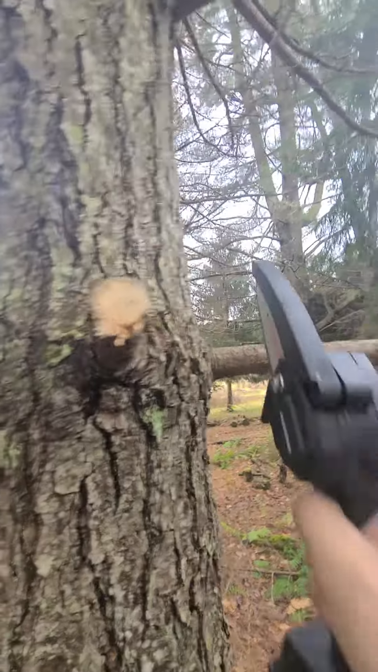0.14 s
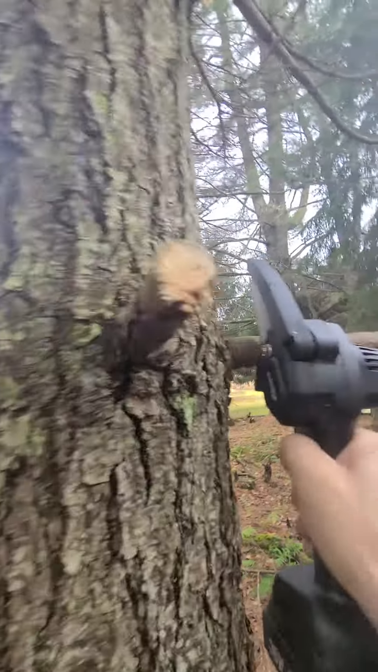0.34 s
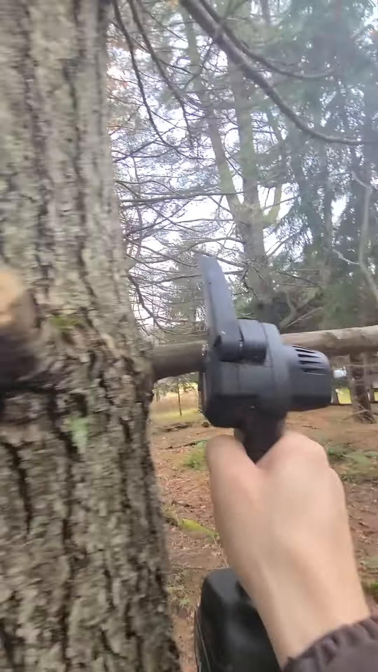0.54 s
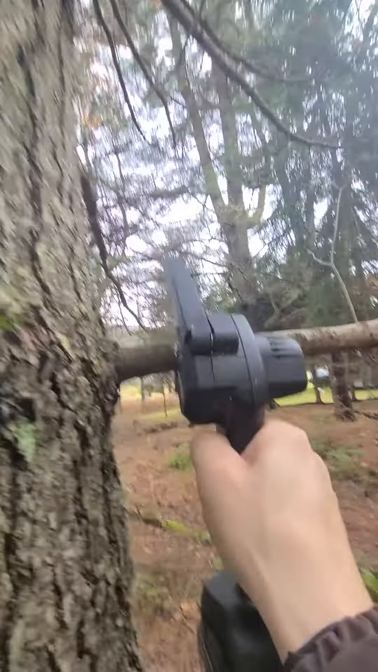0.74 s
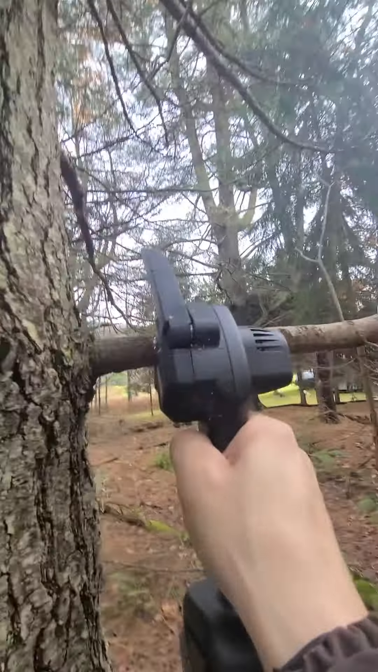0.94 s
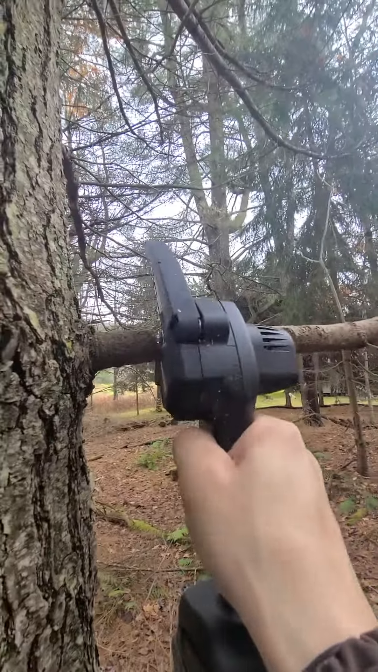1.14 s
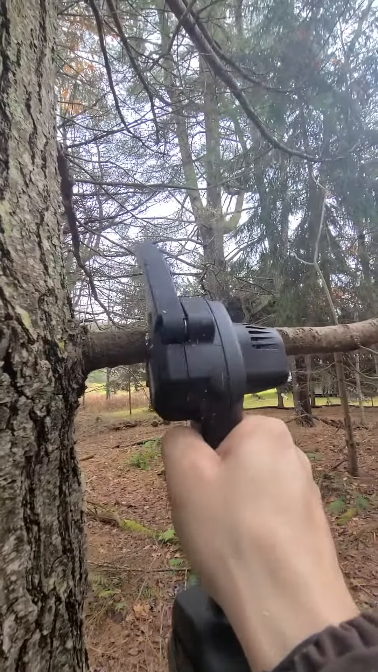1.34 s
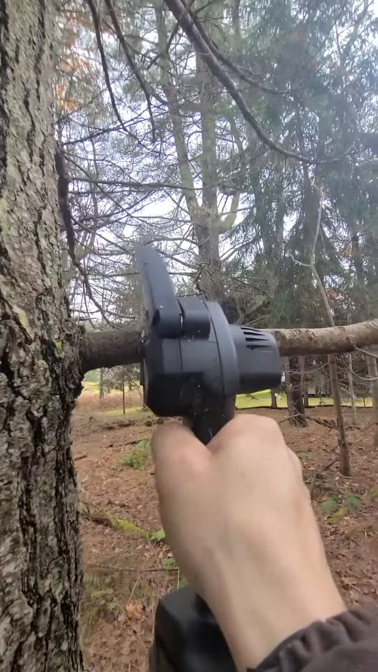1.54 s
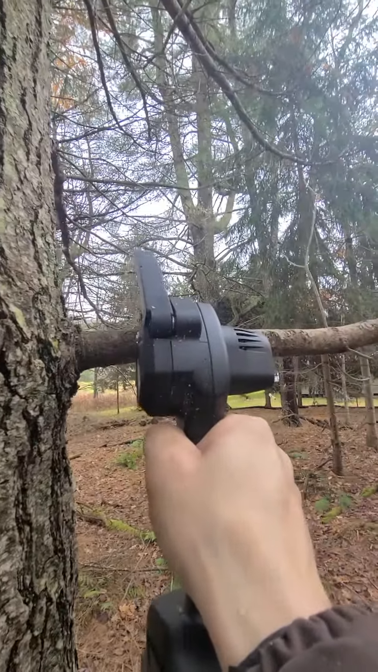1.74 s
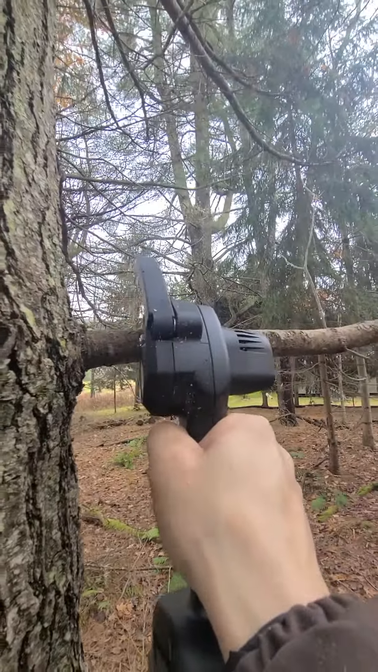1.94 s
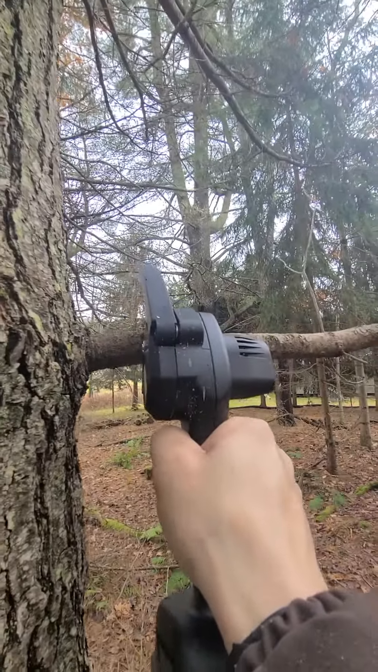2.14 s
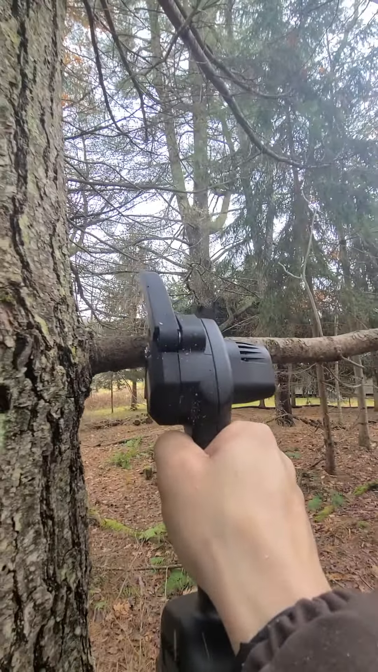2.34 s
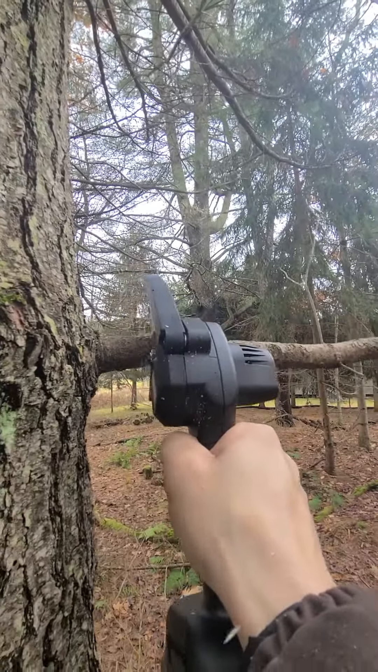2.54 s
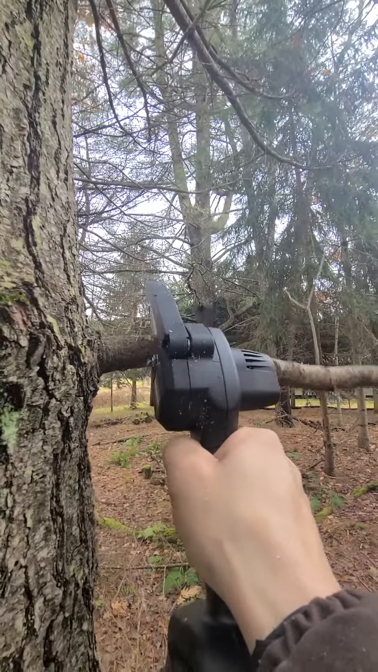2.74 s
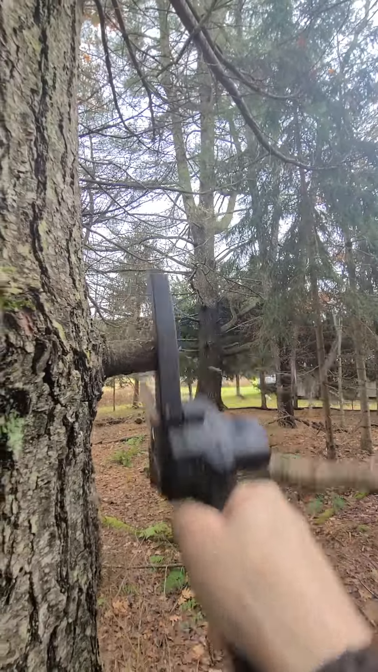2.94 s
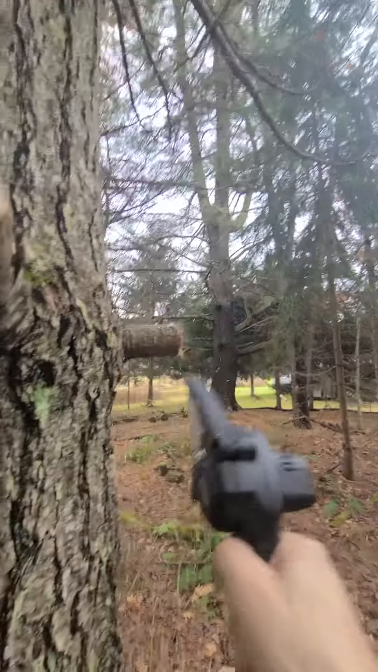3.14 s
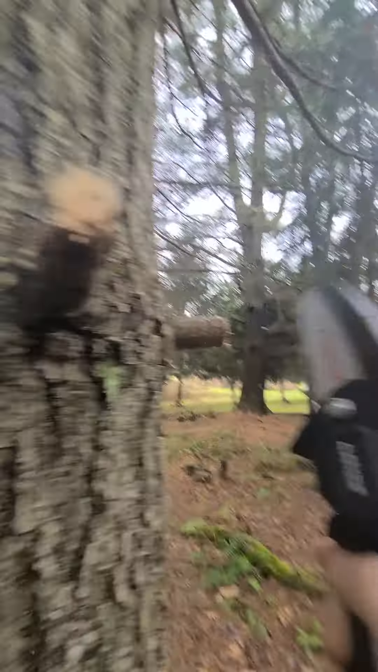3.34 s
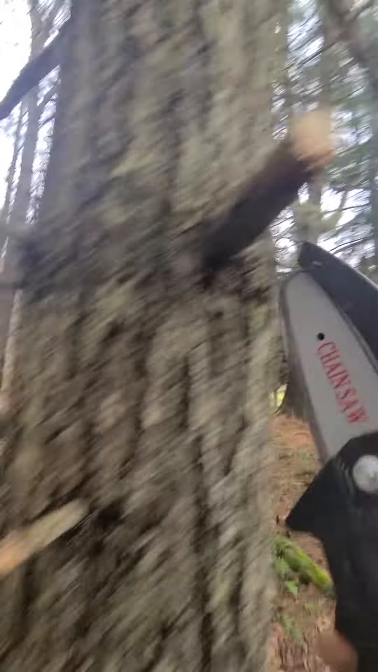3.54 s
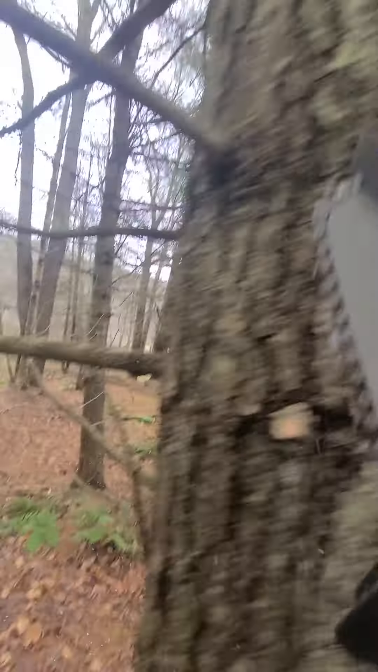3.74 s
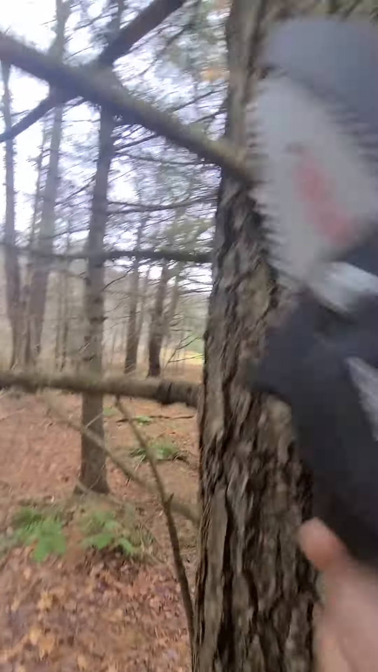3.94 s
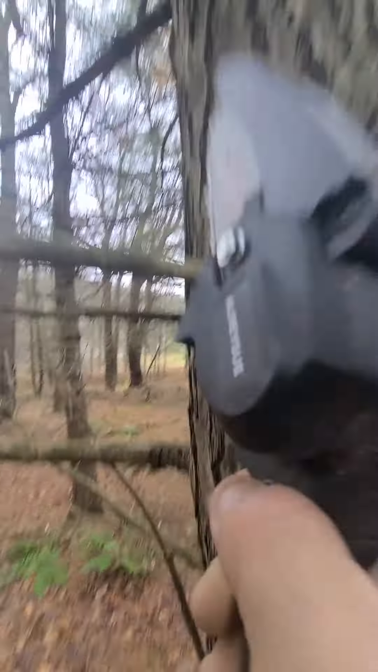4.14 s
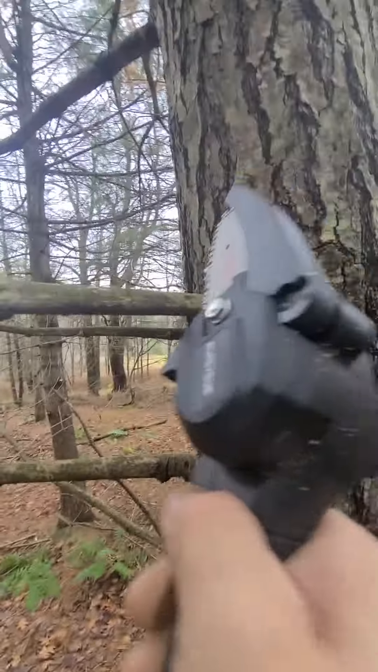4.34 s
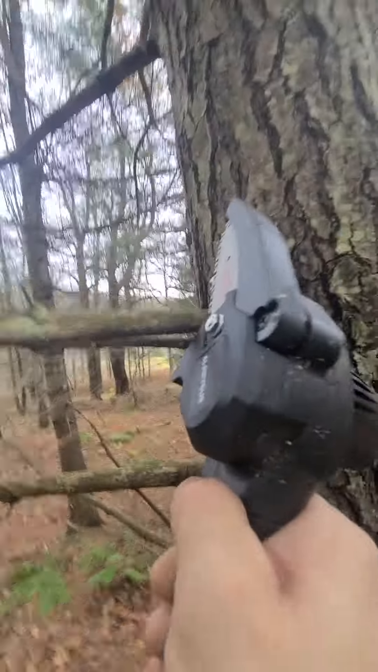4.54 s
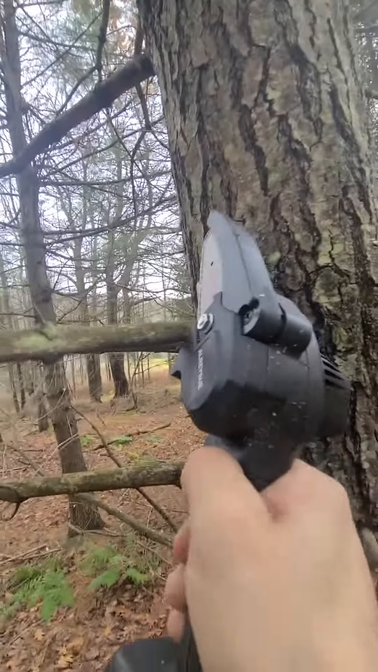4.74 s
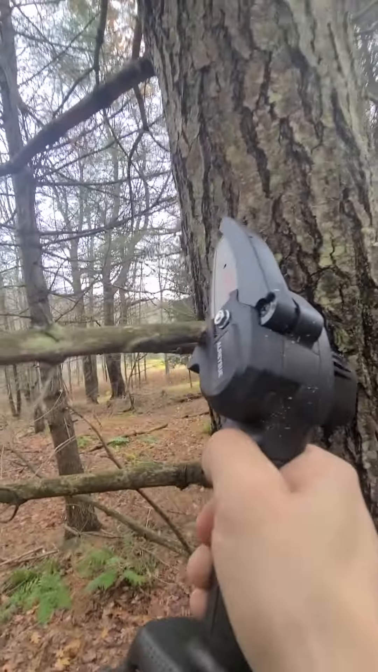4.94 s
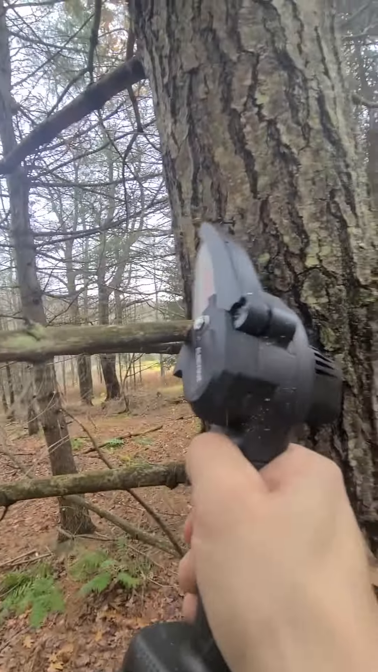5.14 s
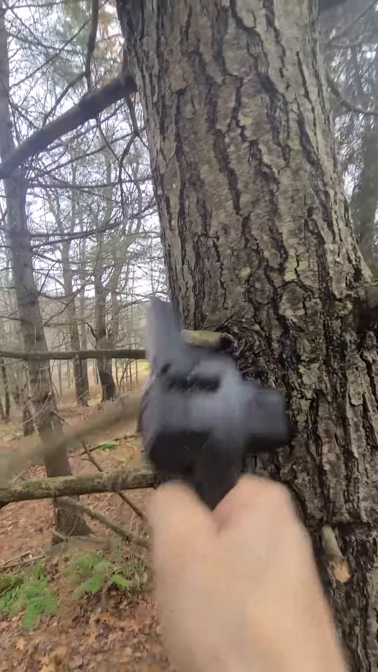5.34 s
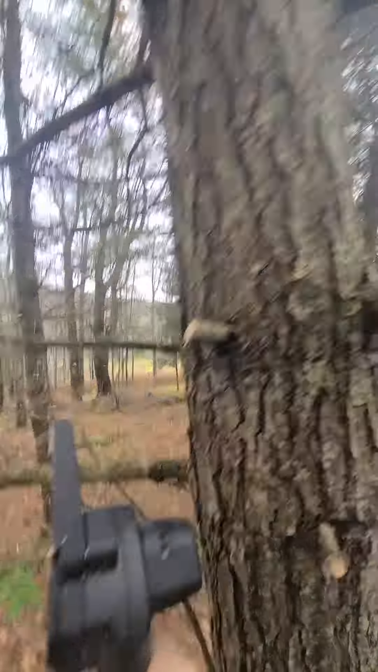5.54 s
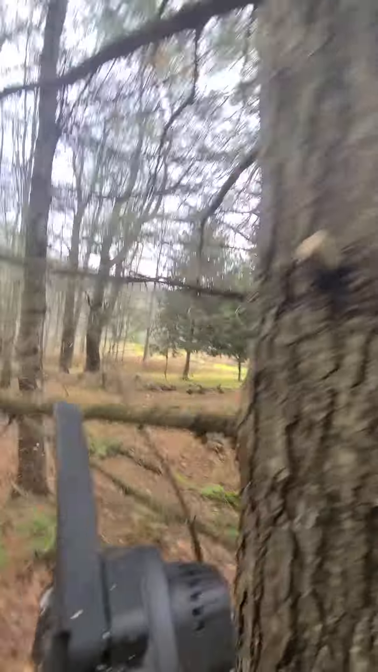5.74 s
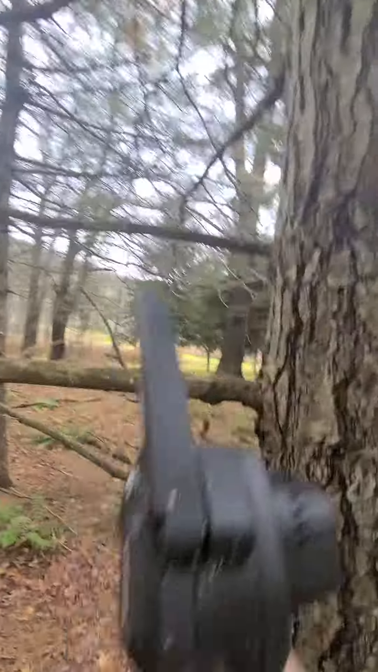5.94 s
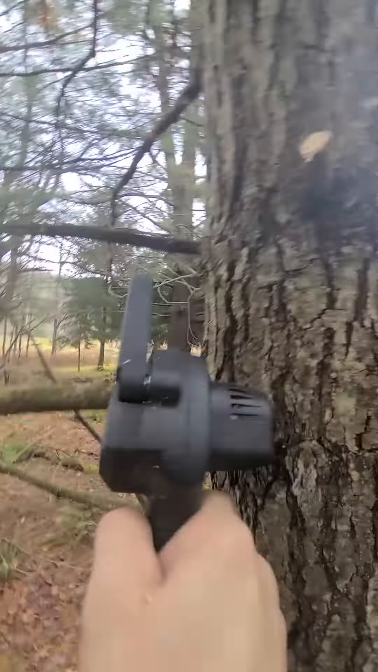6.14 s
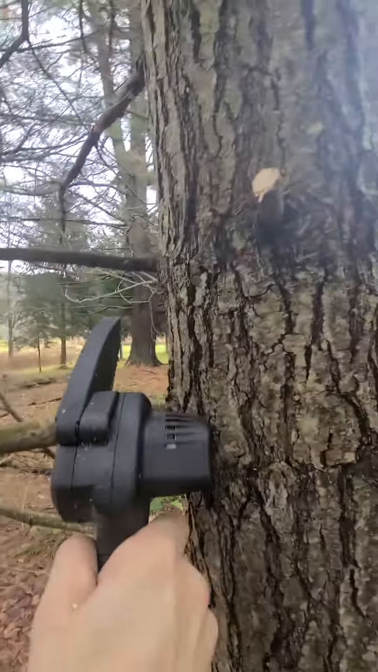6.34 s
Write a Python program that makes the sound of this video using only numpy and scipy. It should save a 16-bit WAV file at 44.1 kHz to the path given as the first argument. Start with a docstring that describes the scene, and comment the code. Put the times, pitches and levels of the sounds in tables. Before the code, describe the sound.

Very close to the microphone, a handheld electric chainsaw makes three cuts outdoors. Small clicks precede a harsh buzzing cut of almost two seconds; the branch gives way, the chain races and winds down with loose metallic slaps, and a soft thud follows. Trigger clicks and rustles lead to a brief second cut and another rattling coast. Light crackles and footfalls come before a third cut, broken off abruptly. The trees are faintly hushed.

```python
"""First a plastic click with a low knock in quiet woodland, then a small battery chainsaw starts up close by.
It lops two dry branches and starts on a third: its teeth chop and snag, and branch and saw ring with them.
Once through the first two, the chain races, whines and coasts to a rattling stop.
Clicks, soft thuds, crackles underfoot and soft swishes lie between the cuts. Short bursts of shaped noise make
the contacts; fading sine waves make the knocks, and wavering tones tied to the chain speed make the whine.
"""
import sys
import numpy as np
from scipy import signal
from scipy.fft import rfft, irfft, next_fast_len
from scipy.io import wavfile
from scipy.ndimage import uniform_filter1d, map_coordinates

SR = 44100
rng = np.random.default_rng(int(sys.argv[2]) if len(sys.argv) > 2 else 0)


def waveform_to_disk(signal):
    """Save audio, clipped to [-1, 1], as 16-bit WAV at the path in sys.argv[1]."""
    frames = np.transpose(np.atleast_2d(signal))
    scaled = np.clip(frames, -1, 1) * 32767
    samples = np.round(scaled).astype(np.int16)
    wavfile.write(sys.argv[1], SR, samples)


N = 286650
SECONDS = np.arange(N) / SR

# All levels in the tables are settings before the final mix.
# Soft swishes of cloth and leaves, and the woodland's echo as the saw stops:
# [loudest at t/s, level/dB, rise t/s, fall t/s]
SWISHES = [(3.58, -41.5, 0.065, 0.23), (3.725, -46.5, .03, 0.014), (3.866, -31, 0.0053, 0.0066),
           (4.295, -38, 0.056, 0.041), (6.16, -50, 0.023, 0.021), (6.25, -41.5, 0.13, 0.15)]
# Tone of the swishes, and of the hush of the trees: [f/Hz, relative level/dB]
CLOTH = [(59, -55), (100, 0), (471, -13), (535, -10), (676, -12), (1010, -20), (2130, -12), (6700, -17.5),
         (8280, -26.5), (16000, -19)]
WOODS = [(12, -61.5), (20, -32), (70, 1), (134, -14.5), (293, -8.5), (527, -11.5), (897, -14),
         (1190, -14.5), (3440, -25.5), (5380, -35), (6540, -31.5), (8180, -49.5), (12400, -39.5),
         (16000, -51.5)]
# Soft thuds of the falling branch and of feet, and a low knock with the first click: [t/s, level/dB, f/Hz]
THUDS = [(0.242, -34, 166), (0.461, -47.5, 110), (3.277, -26, 103), (3.299, -32, 62.1), (3.881, -37, 45.45),
         (4.29, -34.5, 134.2), (4.327, -34, 96), (4.361, -33.5, 104), (6.038, -34, 87), (6.159, -37, 95.3),
         (6.199, -38, 79)]
# Tone of the dull puff in a thud: [f/Hz, relative level/dB]
THUD_PUFF = [(20, -29), (85, 0), (160, -4), (300, -5), (1000, -7.5), (4000, -43)]
# Clicks of trigger, guard and slack chain, and small crackles underfoot:
# [t/s, snap level/dB, hollow knock level/dB, bright edge level/dB]
CLICKS = [(0.239, -16.5, -25.5, -34), (0.264, -37, -32, -50), (0.3033, -37, -47, -44.5),
          (0.4587, -35, -39, -40), (0.514, -41, -41, -51), (0.615, -42, -38, -51),
          (1.0407, -35.5, -14, -65), (3.538, -16.5, -12.5, -44), (3.5581, -22.5, -24, -40),
          (3.6237, -35, -44, -43), (3.8687, -16, -24.5, -40), (4.293, -33, -31, -31.5),
          (4.365, -42, -45, -64), (4.5531, -31, -24, -66), (6.015, -34, -25, -36),
          (6.0384, -22.5, -20.5, -25.5), (6.0758, -28.5, -30, -32), (6.1582, -21.5, -27, -25.5),
          (6.199, -32, -27, -33.5), (6.2917, -55, -31, -54), (6.324, -13.5, -22, -17)]
# Tone of a click: [f/Hz, relative level/dB]
CLICK_TONE = [(200, -17), (1100, 1), (1700, 10), (2500, 2.5), (3400, 3.5), (4500, -8.5), (7000, -17),
              (16000, -50)]
# Hollow notes of the plastic housing: [f/Hz, level/dB, time to fade by 60 dB t/s]
HOUSING = [(396, -14, 0.13), (440, -0.5, 0.047), (564, 1, 0.038), (630.5, 0.5, 0.042), (715, -8.5, 0.057)]

# Pulls of the trigger: [pressed t/s, released t/s, chain stops t/s, rattle level/dB, sizzle level/dB,
#  sizzle left over right level/dB, chain speed at which the rattle is halved (links/s), the same for the
#  sizzle (links/s), housing drone level/dB, lift of the top fizz when not cutting level/dB]
PULLS = [(1.073, 2.905, 3.555, -27.5, -25, 0, 225, 296, -2, 4.5),
         (4.634, 5.315, 6.09, -27, -21.5, -0.5, 330, 345, -9.5, 0.5),
         (6.324, 6.6, 6.7, -26.5, -23.5, 2.5, 460, 230, -4.5, 5)]
# How strongly the drive sings, one value for each pull: [level/dB]
WHINE_DB = [-3, -2.5, -4]
# Rough tones of the drive: [multiple of the link rate, level/dB, width f/Hz]
DRIVE_TONES = [(.4, -39, 30), (.5, -35, 28), (.8, -39, 50), (1, -29.5, 28), (1.22, -40, 60), (1.5, -40, 70),
               (2, -36.5, 55), (2.3, -32.5, 110), (2.75, -36.5, 90), (3.5, -39, 150)]
# How well the housing gives out those tones: [f/Hz, level/dB]
HORN = [(120, -24), (200, -7), (260, -5), (330, -9), (450, 0), (580, 1.2), (700, 1), (800, -4), (930, -3),
        (1100, -6), (1400, -1), (2000, 1), (2600, 0)]
# Tone of the chain's rattle, and of its bright sizzle: [f/Hz, relative level/dB]
RATTLE = [(100, -17.5), (250, -13.5), (420, 1), (620, 1), (850, -1), (1050, 1), (1400, 5), (1900, 3.5),
          (2200, 3.5), (2500, 0), (3400, 4.5), (5000, -7), (9000, -18), (16000, -29.5)]
SIZZLE = [(2000, -26), (4000, -6.5), (5200, -4), (6400, 5.5), (7700, -5.5), (8900, -2), (9900, -2),
          (11000, -0.5), (13000, -2.5), (14500, 0.5), (15600, 5.5)]
# Ringing notes of the steel bar: [f/Hz, width f/Hz, level/dB]
BAR = [(1345, 52, -7.5), (1542, 72, -4), (1855, 140, -3), (2120, 310, -2), (2482, 180, -2), (2940, 110, -2),
       (3245, 77, -1.5)]
# Slaps of the slack chain on the bar as it runs free: [t/s, level/dB]
SLAPS = [(2.952, -14.5), (3.008, -13), (3.175, -14), (3.2131, -14.5), (3.294, -15.5), (3.3383, -16.5),
         (3.36, -16.5), (3.402, -17), (3.4474, -19.5), (3.472, -21), (3.521, -26), (5.2637, -15),
         (5.347, -14), (5.56, -14.5), (5.6553, -13.5), (5.7025, -13), (5.722, -16.5), (5.737, -18),
         (5.766, -19), (5.8, -15), (5.813, -18.5), (5.824, -21.5), (5.889, -21.5), (5.955, -31)]
# Resonances of the saw's shell and bar: [f/Hz, width f/Hz, lift level/dB]
SHELL = [(445, 64, 4.5), (590, 136, 3.5), (690, 32, 5), (1340, 180, 1.5), (1707, 44, 4.5), (1900, 66, 5.5),
         (2430, 120, 4.5), (6400, 460, -3), (8940, 760, 3), (15450, 500, -1.5)]
# The saw at the two microphone ports, three curves: [f/Hz, likeness from 0 to 1],
# [f/Hz, left over right level/dB] and [f/Hz, lead of the left port (radians)]
ALIKE = [(60, 0.21), (350, 0.78), (700, 0.98), (1400, 0.55), (2800, 0.6), (5000, 0.053), (15000, .25)]
TILT = [(60, -3.5), (380, -7), (700, -2.5), (1300, -8.5), (2400, -6.5), (4400, 8), (8000, 19.5),
        (15000, -35)]
LEAD = [(200, -0.21), (400, -0.77), (700, -1.64), (1030, 1.35), (1550, 1.51), (2800, 1.76), (5000, 1.7),
        (9000, 0.83)]

# Cuts: [teeth enter t/s, entering takes t/s, out of the wood t/s, leaving takes t/s, bite level/dB,
#  shudder against bite level/dB, tooth noise against bite level/dB, then changes while cutting:
#  rattle level/dB, sizzle level/dB, sizzle left over right level/dB]
CUTS = [(1.082, 0.02988, 2.829, .11, -20, -18, -7, -2, 3.26, 5.4),
        (4.655, .045, 5.16, .025, -23.5, -13.5, -3.5, 3, 0.62, 7.3),
        (6.345, 0.0305, 6.7, .05, -21.5, -21, -10, 1, 2.6, 3)]
# Hard snags of the teeth, and one knock of the coasting chain: [t/s, level/dB]
SNAGS = [(1.095, -10.5), (1.13, -5), (1.16, -8), (1.192, -9.5), (1.213, -9), (1.243, -9), (1.264, -17),
         (1.351, -18), (1.551, -8.5), (1.599, -20), (1.632, -11.5), (1.659, -11), (1.696, -10.5),
         (1.733, -12.5), (1.763, -10.5), (1.79, -11.5), (1.806, -11.5), (1.861, -6), (1.9925, -10.5),
         (2.1386, -14), (2.26, -8.5), (2.31, -12.5), (2.33, -14), (2.423, -9.5), (2.497, -14), (2.54, -13),
         (2.693, -8), (2.767, -14.5), (2.996, -12.5), (4.686, -8), (4.697, -9), (4.766, -14.5),
         (4.804, -11), (4.963, -13), (5.012, -16), (5.122, -13), (6.369, -10.5), (6.381, -12.5),
         (6.421, -11.5), (6.443, -10), (6.481, -11)]
# Moments when the hand eases off: [t/s, change of level/dB, half length t/s]
EASES = [(1.302, -5, 0.028), (1.898, -2.5, 0.015), (2.089, -1.5, 0.087), (2.385, -2, 0.074),
         (4.918, 0, 0.039), (6.405, -7, 0.014)]
# Tone of the bite, and of the low shudder: [f/Hz, relative level/dB]
BITE = [(150, -33.5), (300, -29.5), (400, 0.5), (580, 5.5), (760, -1.5), (1000, -2.5), (1300, 1),
        (1750, -3), (2200, -19.5), (2600, -27.5), (4500, -19), (6400, -17), (8000, -26), (16000, -19.5)]
SHUDDER = [(20, -11), (52, -5.5), (80, 0), (150, 3.5), (210, 3), (300, -2), (600, -41)]
# Notes of each branch while the teeth are in it: [from t/s, to t/s, f/Hz, width f/Hz, level/dB]
BRANCH = [(1.3, 1.953, 52.7, 9.2, -26), (1.7, 2.9, 2290, 140, -18), (2.2, 2.722, 1286, 36, -13),
          (4.6, 5.004, 203, 29, -12.5), (4.675, 4.74, 203, 38, -4), (4.685, 4.803, 74, 45, -20),
          (4.6, 5.2, 448.5, 8.9, -11.5), (4.6, 5.2, 946, 46, -11.5), (4.6, 5.01, 2660, 180, -7.5),
          (5.04, 5.2, 1450, 310, -6), (6.3, 6.55, 75, 30, -14.5), (6.3, 6.55, 1460, 100, -5.5)]

# Chain speed in links per second: at the first jerk, and running free. Wood slows it by a share, after a lag.
JERK_RATE, FREE_RATE, SPIN_UP_S = 160, 940, .04
LOAD_SAG, INERTIA_S = .17, .04
# Coasting: time constant of the drag, and links per second lost each second to dry friction.
COAST_S, FRICTION_PER_S = 1.0, 600
STOP_S = 0.024  # the last slide before standing still
LASH_DB, LASH_S = 8, 0.061  # extra loudness of the slack chain as it starts
# How steeply rattle and sizzle die as the chain slows (powers of speed), and the sizzle's slower start.
RATTLE_POWER, SIZZLE_POWER, SIZZLE_RISE_S = 2.24, 4.6, 0.034
RING_DB, RING_POWER = -5, 0.31  # bar ringing in the rattle, plainer as the chain slows
FIZZ_HZ = 10600  # the top fizz lies above this
# The teeth grab harder on entering, and again as the last fibres tear.
GRAB_DB, GRAB_S, TEAR_DB, TEAR_S = 3.5, 0.11, 3, 0.075
# The feed wavers at random; rattle and sizzle follow a share of its swings.
FEED_WAVER_DB, FEED_WAVER_HZ, FEED_SHARE = 0.52, 14, 0.79
SHUDDER_FADE_DB = 0.5  # lost from entering to breaking through
TOOTH_NOISE_HZ, TOOTH_NOISE_WIDTH_HZ = 2780, 850
BRANCH_FADE_S = 0.065  # a branch's ring sets in and dies over this time
# Hollow knock with each snag: level against the snag, middle pitch, random spread as a share, fade by 60 dB.
KICK_DB, KICK_HZ, KICK_SPREAD, KICK_T60_S = -1, 560, .13, .024
# Splintering fibres: cracks per second, level against the bite, pitch and width.
SPLINTER_RATE, SPLINTER_DB, SPLINTER_HZ, SPLINTER_WIDTH_HZ = 170, -14, 3400, 3500
TOP_HZ = 15900  # near the top of the fade that removes the highest treble
FIRST_ONLY, PLUS_MINUS = np.array([[1], [0]]), np.array([[1], [-1]])  # how one sound feeds a pair


def amp(db):
    """Turn decibels into a multiplier."""
    return 10 ** (np.asarray(db) / 20)


def lean_right(db):
    """Turn the left down and the right up by this many dB."""
    return amp([[-db], [db]])


def unit(x):
    """Scale to an average (rms) strength of 1."""
    return x / np.sqrt(np.mean(x ** 2) + 1e-20)


def along(points, hz):
    """Read a curve of (Hz, value) points on a log pitch axis."""
    f, value = np.transpose(points)
    return np.interp(np.log(hz + 1), np.log(f + 1), value)


def wobble(rate):
    """A smooth random curve with this many random points a second."""
    points = rng.standard_normal(int(N * rate / SR) + 4)
    return map_coordinates(points, [np.arange(N) * rate / SR])


def noise():
    """Two unrelated white noises, left and right."""
    return rng.standard_normal((2, N))


def smoothed(x, seconds):
    """Follow x with a lag, like a weight that cannot change speed at once."""
    keep = np.exp(-1 / (seconds * SR))
    return signal.lfilter([1 - keep], [1, -keep], x)


def filtered(x, response):
    """Change the strength and phase of x at each frequency."""
    size = next_fast_len(N + 8192)
    spectrum = rfft(x, size) * response(np.fft.rfftfreq(size, 1 / SR))
    return irfft(spectrum, size)[..., :N]


def mode(hz, centre_hz, width_hz):
    """Response of one resonance, which rings after each push; it is 1 at its centre."""
    return 1j * hz * width_hz / (centre_hz ** 2 - hz ** 2 + 1j * hz * width_hz)


def body(x, spectrum, size=4096):
    """Give x this tone, with a filter of unit energy that rings only after each push."""
    log_gain = np.log(amp(along(spectrum, np.fft.rfftfreq(size, 1 / SR))))
    # folding the cepstrum forward in time makes the filter minimum phase
    cepstrum = irfft(log_gain)
    cepstrum[1:size // 2] *= 2
    cepstrum[size // 2 + 1:] = 0
    ring = irfft(np.exp(rfft(cepstrum)))
    return signal.oaconvolve(x, ring[None] / np.linalg.norm(ring), axes=1)[:, :N]


def bursts(times, gains, t60, rise=.001):
    """Noise that swells just before each contact and dies by 60 dB over t60 seconds."""
    places = np.clip(np.asarray(times) * SR, 0, N).astype(int)
    hits = np.bincount(places, np.square(gains), N + 1)[:N]
    power = signal.lfilter([1], [1, -10 ** (-6 / (t60 * SR))], hits)
    # smoothing backwards in time gives the swell
    return noise() * np.sqrt(smoothed(power[::-1], rise)[::-1])


def contacts(rate, scatter, spread_db, t60):
    """Bursts at a moving rate, uneven in time and strength, evened out for the rate and scaled to rms 1."""
    turns = np.cumsum(rate) / SR
    chance = rng.standard_normal((int(turns[-1]), 2))
    uneven_turns = np.arange(len(chance)) + scatter * chance[:, 0]
    times = np.interp(uneven_turns, turns, SECONDS)
    strengths = amp(spread_db * np.minimum(chance[:, 1], 1.6))
    return unit(bursts(times, strengths, t60, rise=t60 / 40) / np.sqrt(rate))


def fading_note(hz, t60, attack, samples):
    """A sine that sets in over the attack time and dies by 60 dB over t60."""
    t = np.arange(samples) / SR
    return amp(-60 * t / t60) * np.sin(2 * np.pi * hz * t) * (1 - np.exp(-t / attack))


def add_at(track, start, sound):
    """Add a short sound to a track at a time in seconds."""
    track[int(start * SR):][:len(sound)] += sound


def swishes():
    """Loudness of the soft swishes: each swells and dies away exponentially."""
    return sum(amp(db) * np.exp(-np.maximum((s - SECONDS) / rise, (SECONDS - s) / fall))
               for s, db, rise, fall in SWISHES)


def woodland():
    """Swishes of many tiny noise grains over a faint, wavering noise of trees, both stronger on the right."""
    grains = contacts(np.full(N, 500), scatter=0.97, spread_db=-1.0, t60=0.023)
    rustle = amp(-6.0) * swishes() * body(grains, CLOTH)
    hush = amp(-56.5 + 0.6 * wobble(9.8) + 0.53 * wobble(2.27)) * body(noise(), WOODS)
    both = rustle + hush
    # a little of each side leaks into the other
    return (both + 0.12 * both[::-1]) * lean_right(1.5)


def thuds():
    """Soft thuds, and the low knock with the first click: a short low note with a dull puff of noise."""
    s, db, _ = np.transpose(THUDS)
    notes = np.zeros(N + SR)
    for start, level_db, hz in THUDS:
        add_at(notes, start, amp(level_db + 5.0) * fading_note(hz, 0.059, 0.0024, SR // 4))
    puffs = body(bursts(s, amp(db), t60=0.088, rise=0.003), THUD_PUFF)
    return (notes[:N] + amp(-3.5) * puffs) * lean_right(2)


def clicks_and_crackles():
    """Each click or crackle is a short snap with a bright edge and a hollow knock of fading notes."""
    s, db, knock_db, edge_db = np.transpose(CLICKS)
    snap = bursts(s, amp(db), t60=.008, rise=.0006)
    tail = bursts(s, amp(db), t60=0.032, rise=0.0014)
    clicks = body(amp(-1.5) * snap + amp(-12) * tail, CLICK_TONE)
    edges = amp(1) * body(bursts(s, amp(edge_db), t60=0.038, rise=0.00031), SIZZLE)
    knocks, t = np.zeros(N + SR), np.arange(SR // 5) / SR
    for start, strength_db in zip(s, knock_db):
        # each knock mixes the notes a little differently
        ring = sum(amp(db + rng.normal(0, 2.0) - 60 * t / t60)
                   * np.sin(2 * np.pi * (hz * t + rng.random())) for hz, db, t60 in HOUSING)
        add_at(knocks, start, amp(strength_db - 6.5) * ring * (1 - np.exp(-t / 0.0023)))
    return edges + (clicks + knocks[:N]) * lean_right(1.5)


def ports(pair):
    """The saw reaches the two ports with its own likeness, level and phase at each frequency."""
    def turn(hz):
        return np.arccos(np.clip(along(ALIKE, hz), 0, 1)) / 2

    def half(hz):
        return amp(along(TILT, hz) / 2) * np.exp(.5j * along(LEAD, hz))

    shared, apart = filtered(pair, lambda hz: np.array([np.cos(turn(hz)), np.sin(turn(hz))]))
    left_right = np.array([shared + apart, shared - apart])
    return filtered(left_right, lambda hz: np.array([half(hz), 1 / half(hz)]))


def shell(x):
    """The resonances of shell and bar lift or dip narrow bands of the sound."""
    return filtered(x, lambda hz: 1 + sum((amp(db) - 1) * mode(hz, c, w) for c, w, db in SHELL))


def in_wood():
    """How fully the teeth are engaged, 0 to 1: one row for each cut."""
    return np.array([np.clip((SECONDS - enter) / sink, 0, 1) * np.clip((out - SECONDS) / leave, 0, 1)
                     for enter, sink, out, leave, *_ in CUTS])


def feed():
    """How hard the saw is pressed into the wood, in dB about its usual force."""
    grabs = sum(GRAB_DB * np.exp(-abs(SECONDS - enter) / GRAB_S)
                + TEAR_DB * np.exp(-abs(SECONDS - out) / TEAR_S) for enter, _, out, *_ in CUTS)
    eases = sum(db * np.exp(-((SECONDS - s) / half) ** 2) for s, db, half in EASES)
    return grabs + eases + FEED_WAVER_DB * wobble(FEED_WAVER_HZ)


def motor(load):
    """Each pull spins the chain up, wood slows it, and drag and friction let it coast to a stop."""
    links, gains = np.zeros(N), np.zeros((6, N))
    sag = LOAD_SAG * smoothed(load, INERTIA_S)
    for pull, whine_db in zip(PULLS, WHINE_DB):
        pressed, released, stop, rattle_db, sizzle_db, side_db, *rest = pull
        rattle_rate, sizzle_rate, drone_db, fizz_db = rest
        age = np.maximum(SECONDS - pressed, 0)
        running = (SECONDS > pressed) * np.clip((stop - SECONDS) / STOP_S, 0, 1)
        driven = (FREE_RATE - (FREE_RATE - JERK_RATE) * np.exp(-age / SPIN_UP_S)) * (1 - sag)
        coast = np.exp(-np.maximum(SECONDS - released, 0) / COAST_S)
        rate = np.maximum(driven * coast - FRICTION_PER_S * COAST_S * (1 - coast), 20)
        lash_db = LASH_DB * np.exp(-age / LASH_S)
        rattle = amp(rattle_db + lash_db) / (1 + (rattle_rate / rate) ** RATTLE_POWER)
        sizzle_start = 1 - np.exp(-age / SIZZLE_RISE_S)
        sizzle = amp(sizzle_db + lash_db / 2) * sizzle_start / (1 + (sizzle_rate / rate) ** SIZZLE_POWER)
        links += (running > 0) * rate
        settings = rattle, sizzle, amp(whine_db), amp(drone_db), fizz_db, side_db
        gains += running * np.array(np.broadcast_arrays(*settings))
    # link rate, gains of rattle, sizzle, whine and drone, then fizz dB and sizzle left over right dB
    return np.maximum(links, 20), *uniform_filter1d(gains, size=300, axis=1)


def whine(links, bounce):
    """The drive sings at multiples of the link rate; the lashing chain smears each tone and breaks it up."""
    uneven_rate = links * (1 + .016 * wobble(160) + .007 * wobble(22))
    phase = 2 * np.pi * np.cumsum(uneven_rate) / SR
    tones = sum(amp(db) * (wobble(width) * np.sin(k * phase) + wobble(width) * np.cos(k * phase))
                for k, db, width in DRIVE_TONES)
    drive = np.clip((links - 200) / 450, 0, 1) * unit(amp(1.2 * bounce))
    return filtered(tones * drive, lambda hz: amp(along(HORN, hz))) * lean_right(2)


def ringing(rate):
    """Links strike the bar so that each of its notes has its own rhythm, and swells and fades by itself."""
    notes = 0
    for centre, width, db in BAR:
        strikes = contacts(rate, scatter=.8, spread_db=2.5, t60=.003)
        note = unit(filtered(strikes, lambda hz: mode(hz, centre, width)))
        notes = notes + amp(db + 3 * wobble(9)) * note
    return unit(notes)


def slaps():
    """Each hard slap is a clack that rings the bar, with a bright spit of the links."""
    s, db = np.transpose(SLAPS)
    blows = bursts(s, amp(db), t60=0.041, rise=0.00054)
    ring = filtered(blows, lambda hz: sum(amp(level) * mode(hz, c, w) for c, w, level in BAR))
    clack = ports(amp(8.5) * ring + amp(-10.5) * body(blows, RATTLE))
    return clack + amp(-12.5) * body(blows, SIZZLE)


def housing_response(hz):
    """The housing's hollow notes; a longer fade means a narrower resonance."""
    return sum(amp(db) * mode(hz, centre, np.log(1000) / np.pi / t60) for centre, db, t60 in HOUSING)


def chain(links, bounce, rattle_gain, sizzle_gain, drone_gain, fizz_db, free_side_db, engaged):
    """Links tick and scrape along the bar; the slack chain flaps, rings the bar and drums on the housing."""
    rattle_db, sizzle_db, side_db = np.transpose(CUTS)[-3:] @ engaged
    shake = amp(1.1 * bounce)
    ticks = contacts(links, scatter=0.31, spread_db=1.5, t60=0.0092)
    flaps = contacts(links / 6, scatter=.7, spread_db=2.5, t60=.02)
    drag = amp(-0.5) * noise()
    clatter = body(unit((ticks + amp(-2.5) * flaps + drag) * shake), RATTLE)
    slow_lift = (FREE_RATE / np.maximum(links, JERK_RATE)) ** RING_POWER
    ring = amp(RING_DB) * slow_lift * ringing(links / 3)
    drone = drone_gain * unit(filtered(ticks, housing_response))
    rattle = amp(1 + rattle_db) * rattle_gain * (clatter + ring + amp(-4.5) * drone)

    scrape = contacts(links / 2, scatter=.3, spread_db=3, t60=.011)
    rubbing = (scrape + amp(-3.5) * flaps + amp(-0.5) * noise()) * np.sqrt(shake)
    sizzle = amp(4.0 + sizzle_db) * sizzle_gain * body(unit(rubbing), SIZZLE)
    fizz = filtered(sizzle, lambda hz: 1 - 1 / (1 + (hz / FIZZ_HZ) ** 20))
    # the top fizz is lifted only while the chain is out of the wood
    sizzle = sizzle + (amp(fizz_db * (1 - engaged.sum(axis=0))) - 1) * fizz
    return ports(rattle) + sizzle * amp((free_side_db + side_db) * PLUS_MINUS / 2)


def kicks():
    """Each snag, and the coasting chain's knock, jerks the saw: a brief hollow note at a random pitch."""
    knocks = np.zeros(N + SR)
    for (start, db), chance in zip(SNAGS, rng.standard_normal(len(SNAGS))):
        hz = KICK_HZ * np.exp(KICK_SPREAD * chance)
        add_at(knocks, start, amp(db + KICK_DB) * fading_note(hz, KICK_T60_S, .0012, SR // 20))
    return knocks[:N] * FIRST_ONLY


def splinters():
    """Dry fibres give tiny sharp cracks at uneven moments, of very uneven size."""
    cracks = contacts(np.full(N, SPLINTER_RATE), scatter=1, spread_db=5, t60=.002)
    tone = filtered(cracks, lambda hz: mode(hz, SPLINTER_HZ, SPLINTER_WIDTH_HZ))
    return amp(SPLINTER_DB) * unit(tone)


def branch_ring(push):
    """The pushes of the teeth set off each branch's own notes while they are in it."""
    rings = 0
    for start, end, centre, width, db in BRANCH:
        fade = np.clip(np.minimum(SECONDS - start, end - SECONDS) / BRANCH_FADE_S, 0, 1)
        note = unit(filtered(push, lambda hz: mode(hz, centre, width)))
        rings = rings + amp(db) * fade * note
    return rings


def cutting(links, bounce, engaged, feed_db):
    """Every second link carries a tooth; they bite hardest as the bar bounces down, shaking saw and branch."""
    teeth = contacts(links / 2, scatter=0.13, spread_db=4, t60=0.005)
    jolts = contacts(links / 7, scatter=0.4, spread_db=1.5, t60=0.008)
    chop = unit((teeth + amp(-1) * jolts) * amp(2.8 * bounce))
    enter, _, out, _, bite_db, shudder_db, tooth_noise_db, *_ = np.transpose(CUTS)
    forces = amp(bite_db)[:, None] * engaged * amp(feed_db)
    force = forces.sum(axis=0)
    bite = amp(-0.5) * force * body(chop, BITE)

    # the branch shudders a little less as the cut deepens
    depth = np.clip((SECONDS - enter[:, None]) / (out - enter)[:, None], 0, 1)
    shudder_gain = amp(shudder_db) @ (forces * amp(-SHUDDER_FADE_DB * depth))
    shudder = shudder_gain * (body(chop, SHUDDER) + amp(-7) * bounce * FIRST_ONLY)

    # a rough, wide band of tooth noise around 2.8 kHz, spread to both sides
    band = unit(filtered(chop[1], lambda hz: mode(hz, TOOTH_NOISE_HZ, TOOTH_NOISE_WIDTH_HZ) ** 2))
    tooth_noise = (amp(tooth_noise_db) @ forces) * band * PLUS_MINUS
    wood = force * (branch_ring(chop[0]) * lean_right(2) + splinters())

    s, db = np.transpose(SNAGS)
    tugs = bursts(s, amp(db), t60=0.033, rise=0.0006)
    snags = amp(-4) * body(tugs, BITE) + amp(-11.5) * body(tugs, RATTLE)
    bright_snags = amp(-16) * body(tugs, SIZZLE)
    return ports(bite + shudder + snags + kicks()) + wood + tooth_noise + bright_snags


def scene():
    """The saw in front of the microphone, with the woodland around it."""
    engaged, feed_db = in_wood(), feed()
    load = engaged.sum(axis=0)
    links, rattle_gain, sizzle_gain, whine_gain, drone_gain, fizz_db, side_db = motor(load)
    # the running chain bounces the bar about once in fifteen links
    bounce_rate = links / 15 * (1 + .08 * wobble(25))
    bounce = np.cos(2 * np.pi * np.cumsum(bounce_rate) / SR)
    steel = chain(links, bounce, rattle_gain, sizzle_gain, drone_gain, fizz_db, side_db, engaged)
    steel = steel * amp(FEED_SHARE * load * feed_db)
    saw = shell(steel + slaps() + cutting(links, bounce, engaged, feed_db))
    saw = saw + whine_gain * whine(links, bounce)
    return woodland() + thuds() + clicks_and_crackles() + saw


def record(dry):
    """Round off peaks near full scale, then fade out the treble just below 16 kHz."""
    held = dry / (1 + np.abs(dry / .9) ** 4) ** .25
    return filtered(held, lambda hz: np.clip((TOP_HZ + 100 - hz) / 300, 0, 1) ** 2)


dry = scene()
out = record(dry)
waveform_to_disk(out)
```